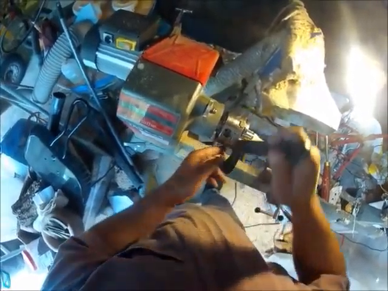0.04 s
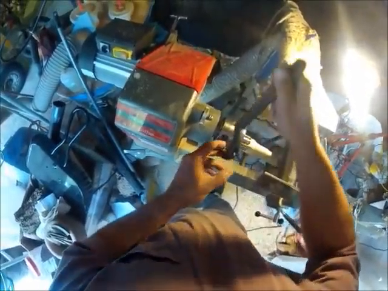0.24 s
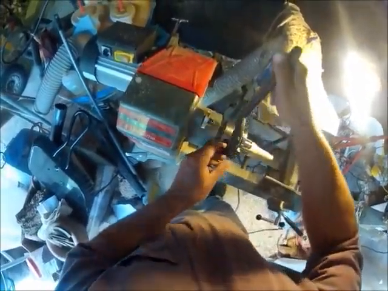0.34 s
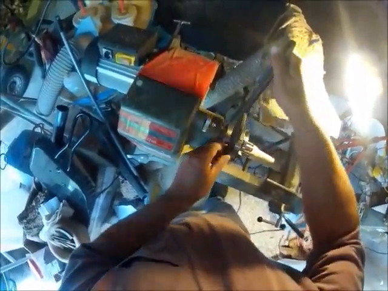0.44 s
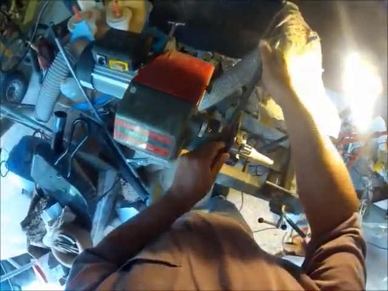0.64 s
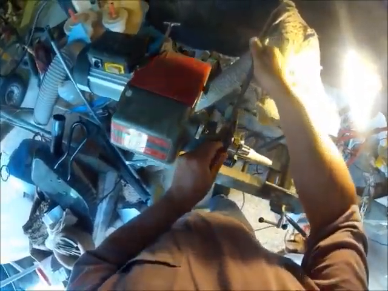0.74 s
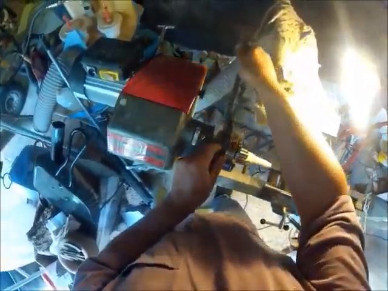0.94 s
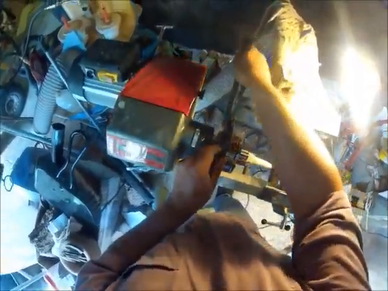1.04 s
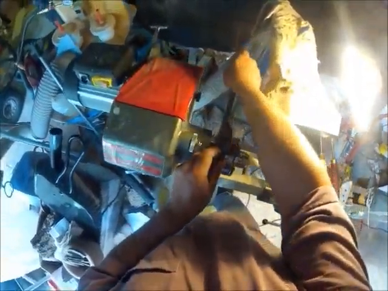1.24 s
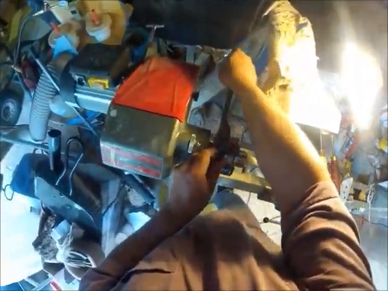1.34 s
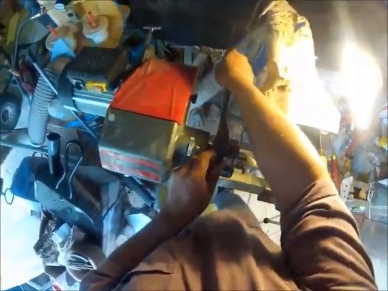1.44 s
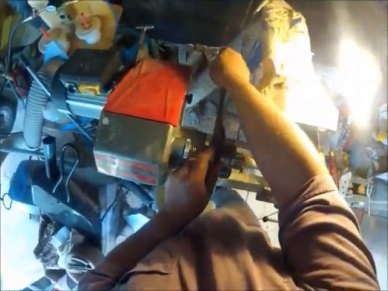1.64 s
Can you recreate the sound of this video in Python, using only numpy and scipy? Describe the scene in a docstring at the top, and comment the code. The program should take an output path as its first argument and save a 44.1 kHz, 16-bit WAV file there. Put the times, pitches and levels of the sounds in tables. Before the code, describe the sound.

A steel tool clinks against a lathe chuck, lightly at first, then with a sharp ringing hit and a tiny squeak at about 0.4 seconds. Around 0.7 seconds it catches with a quick rattle and skids again. The spindle then rubs softly and knocks dully through the machine at about 0.95 and 1.3 seconds. Everything is close, over a low workshop rumble and faint hiss.

```python
"""In a cluttered workshop, a steel tool is fitted against the chuck (the clamp) of a small bench lathe. It
clinks, skids and catches on a jaw with a rattle. Then the spindle (the turning shaft) is rocked: it rubs softly
and knocks twice through the frame. Each contact is a short crack or thud plus the ringing of the parts it
shakes. A low rumble that swells and sinks and a faint hiss lie underneath."""
import sys
import numpy as np
from scipy import signal
from scipy.fft import rfft, irfft
from scipy.io import wavfile

SR = 44100
rng = np.random.default_rng(int(sys.argv[2]) if len(sys.argv) > 2 else 0)


def persist_wave(psi):
    """Save psi, clipped to +-1, as 16-bit WAV."""
    counts = np.round(np.clip(psi, -1, 1) * 32767).astype(np.int16)
    wavfile.write(sys.argv[1], SR, np.atleast_2d(counts).T)


N = 74970
T = np.arange(N) / SR
STEEL_ATTACK_S, CRACK_ATTACK_S, FRAME_ATTACK_S = 0.00019, 0.0013, 0.0019
CLASH_FADE_S, ROOM_FADE_S = 0.078, 0.54   # a fade time is how long a sound takes to drop 60 dB


def from_db(db):
    """Turn decibels into a gain."""
    return 10 ** (np.asarray(db) / 20)


def at_hz(points, hz):
    """Read between a table's rows, giving each octave equal room."""
    f, value = np.transpose(points)
    return np.interp(np.log(hz + 1e-3), np.log(f), value)


def coloured(spectrum):
    """Noise of strength 1; the table sets only the balance of low and high."""
    gain = from_db(at_hz(spectrum, np.arange(N // 2 + 1) * SR / N))
    noise = irfft(rfft(rng.standard_normal(N)) * gain, N)
    return noise / noise.std()


def fade(fade_s):
    """Die away from 1, losing 60 dB every fade_s seconds."""
    return np.exp(-np.log(1000) * T / fade_s)


def wander(rate_hz):
    """A random drift, typically about 1 either side of zero."""
    return np.interp(T * rate_hz, np.arange(1024), rng.standard_normal(1024)) * np.sqrt(3 / 2)


def delayed(sound, start_s):
    """Make a sound begin at start_s."""
    return np.concatenate([np.zeros(int(max(start_s, 0) * SR)), sound])[:N]


def struck(tones, times, levels_db, attack_s, flutter_hz, flutter_db, blur_rad, clash_db):
    """A hit gives a part's own tones a brief clash, then a ring that flutters with reflections."""
    def energy(fade_s):
        blow = (fade(fade_s) * (1 - np.exp(-T / attack_s))) ** 2
        return sum(from_db(db) ** 2 * delayed(blow, t) for t, db in zip(times, levels_db))
    out = np.zeros(N)
    clash = from_db(clash_db) ** 2 * energy(CLASH_FADE_S)
    for hz, db, fade_s in tones:
        ring = energy(fade_s) * from_db(flutter_db * wander(flutter_hz)) ** 2
        phase = 2 * np.pi * (hz * T + rng.random()) + blur_rad * wander(flutter_hz)
        out += from_db(db) * np.sqrt(clash + ring) * np.sin(phase)
    return out


def bursts(spectrum, fades, times, levels_db, attack_s, tail_db):
    """Crowded tones blur into noise that dies band by band and leaves a faint tail in the room."""
    noise = rfft(coloured(spectrum))
    hz = np.arange(N // 2 + 1) * SR / N
    tail = from_db(tail_db) * fade(ROOM_FADE_S)
    out = np.zeros(N)
    for band_hz, fade_s in fades:
        band = at_hz([(f, float(f == band_hz)) for f, _ in fades], hz)
        shape = np.hypot(fade(fade_s), tail) * (1 - np.exp(-T / attack_s))
        energy = sum(delayed(from_db(db) * shape, t) ** 2 for t, db in zip(times, levels_db))
        out += irfft(noise * band, N) * np.sqrt(energy)
    return out


# colour of the background hiss and of the rumble: f/Hz, relative level/dB
HISS_COLOUR = [(30, -4), (100, 2), (185, 1), (280, 0), (420, -4), (700, -9), (1000, -18), (2000, -23),
               (4000, -28), (6000, -37.5), (8500, -38.5), (10500, -47), (12300, -34), (13500, -54),
               (16000, -45)]
RUMBLE_COLOUR = [(20, -10), (45, -9.5), (72, 3), (115, 1.5), (160, -8), (300, -29), (1000, -41)]
# how loud the rumble is over time: t/s, level/dB
RUMBLE_SWELLS = [(0, -54), (.09, -55.5), (.14, -52.5), (.3, -52.5), (.41, -53), (.46, -58), (.62, -52.5),
                 (.85, -61), (1.0, -49), (1.12, -53), (1.25, -56), (1.5, -55), (1.7, -53.5)]
def background():
    """A steady hiss lies over a rumble that swells and sinks."""
    hiss = from_db(-56) * coloured(HISS_COLOUR)
    rumble_db = np.interp(T, *np.transpose(RUMBLE_SWELLS))
    return hiss + from_db(rumble_db) * coloured(RUMBLE_COLOUR)


# the tones the tool rings with: f/Hz, relative level/dB, fade/s
TOOL_TONES = [(4832, -3, 0.16), (4897, -8.5, 0.34), (7095, -12, 0.31), (7170, -7, 0.23)]
def tool_ring(times, levels_db):
    """The tool rings freely until it comes to rest and is muffled; later hits ring afresh."""
    rest_s, muffle_s, muffle_db = 0.507, 0.018, -9.5
    early = times < rest_s + muffle_s
    muffle = from_db(muffle_db * np.clip((T - rest_s) / muffle_s, 0, 1))
    before, after = [struck(TOOL_TONES, times[pick], levels_db[pick], STEEL_ATTACK_S,
                            flutter_hz=129.9, flutter_db=2, blur_rad=0.53, clash_db=-1)
                     for pick in (early, ~early)]
    return muffle * before + after


# the tones of the chuck, the lathe's frame and a plate on it: f/Hz, relative level/dB, fade/s
CHUCK_TONES = [(2042, -6, 0.067), (2259, -1.5, 0.17), (2959, -12.5, 0.22), (3460, -5.5, 0.15),
               (3526, -5, 0.1), (3620, -5, 0.1), (4270, -13.5, 0.19), (4375, -24, 0.099), (7860, -15, 0.11),
               (8450, -7.5, 0.087), (8850, -35, 0.27), (9770, -12, 0.14), (14150, -14, 0.13),
               (15100, -28, 0.08)]
FRAME_TONES = [(194, -8.5, 0.58), (227.8, -9, .45), (279.3, -7, 0.46), (289.3, -1.5, 0.66),
               (322, -13, 0.68), (378.4, -6.5, 0.34), (394.6, -3.5, 0.19), (502.5, -12, .25)]
PLATE_TONES = [(645, -9.5, .35), (705, -9, 0.43), (704, 2, 0.11), (765, -17, .2), (1107, -27.5, 0.69)]
# colour of the crack of a contact: f/Hz, relative level/dB
CRACK_COLOUR = [(150, -3.5), (400, 6.5), (720, -9.5), (950, -8), (1350, -7.5), (2100, 4.5), (3400, 0.5),
                (5000, -7), (6000, -9.5), (7200, -10), (9300, -5.5), (10800, -20), (13000, -15.5),
                (14600, -9.5), (16000, -1)]
# how long the crack lasts in each band: f/Hz, fade/s
CRACK_FADES = [(200, 0.29), (1000, 0.28), (3000, 0.11), (8000, 0.19), (15000, 0.043)]
# the tool hits the chuck: t/s, then level/dB of tool, chuck, crack, frame, plate
TOOL_HITS = [(0.001, -72, -58, -53.5, -56, -59), (0.017, -57, -52, -49, -55.5, -64),
             (0.207, -51.5, -59, -55, -74, -82), (0.2151, -46.5, -44, -53.5, -80, -58.5),
             (0.322, -59, -59, -58, -68, -75), (0.365, -61, -76, -60, -75, -77),
             (0.429, -69, -49, -40.5, -52.5, -49), (0.4309, -30, -41.5, -35.5, -47.5, -43),
             (0.44, -61, -45.5, -48, -47.5, -62), (0.504, -39.5, -56.5, -53, -73, -81),
             (0.568, -50, -49, -47.5, -79, -83), (0.58, -77, -56, -50, -78, -71),
             (0.67, -38, -42, -35.5, -38, -35), (0.685, -36.5, -41, -33.5, -34, -43.5),
             (0.725, -39.5, -34.5, -35.5, -47, -49), (0.745, -54, -35.5, -36, -48.5, -49),
             (0.906, -84, -57, -52, -68, -77), (0.92, -86, -57, -49.5, -60, -53),
             (0.945, -63, -46, -48.5, -44, -39.5), (1.194, -87, -77, -62.5, -56, -60.5),
             (1.233, -88, -72, -56.5, -52, -58)]
def clinks():
    """Steel hits steel with a crack: tool and chuck ring, and frame and plate answer lower down."""
    times, tool_db, chuck_db, crack_db, frame_db, plate_db = np.transpose(TOOL_HITS)
    tool = tool_ring(times, tool_db)
    chuck = struck(CHUCK_TONES, times, chuck_db, STEEL_ATTACK_S,
                   flutter_hz=150.2, flutter_db=3, blur_rad=0.95, clash_db=-4.5)
    frame = struck(FRAME_TONES, times, frame_db, FRAME_ATTACK_S,
                   flutter_hz=54.55, flutter_db=3, blur_rad=0.3, clash_db=-5)
    plate = struck(PLATE_TONES, times, plate_db, FRAME_ATTACK_S,
                   flutter_hz=68.98, flutter_db=2.9, blur_rad=1, clash_db=2.5)
    crack = bursts(CRACK_COLOUR, CRACK_FADES, times, crack_db, CRACK_ATTACK_S, tail_db=-11)
    return tool + chuck + frame + plate + crack


# the chuck's squeaking tones: f/Hz, relative level/dB, fade/s
SQUEAK_TONES = [(3510, -0.5, 0.11), (3605, -2.5, .07), (3350, -11, .06), (4300, -15, 0.047),
                (8480, -7, 0.094), (8580, -10, 0.075)]
# the tool slips over the chuck: t/s, level/dB
TOOL_SLIPS = [(0.4332, -36.5), (0.746, -34)]
def skids():
    """A slip drives a few of the chuck's tones hard, making a short squeak."""
    times, levels_db = np.transpose(TOOL_SLIPS)
    return struck(SQUEAK_TONES, times, levels_db, attack_s=0.001,
                  flutter_hz=196.3, flutter_db=3.5, blur_rad=0.32, clash_db=-5)


# the tones of one gripping jaw of the chuck: f/Hz, relative level/dB, fade/s
JAW_TONES = [(2068, 0, 0.23), (2878, -12, 0.31), (2950, -8.5, 0.35), (3293, -0.5, 0.13), (8650, -11.5, .13),
             (9030, -14, 0.25), (9933, -9.5, 0.13), (11400, -23, 0.47), (12660, -25, .17),
             (14066, -12, 0.16), (14780, -18, .13), (15000, -21, .13)]
# the tool catches on the jaw: t/s, level/dB
JAW_BITES = [(0.672, -35), (0.941, -50.5)]
def catches():
    """A chuck jaw rings briefly as the tool bites."""
    times, levels_db = np.transpose(JAW_BITES)
    return struck(JAW_TONES, times, levels_db, STEEL_ATTACK_S,
                  flutter_hz=139.2, flutter_db=5, blur_rad=0.19, clash_db=-13.5)


# colour of the rubbing: f/Hz, relative level/dB
RUB_COLOUR = [(100, -10), (200, 9.5), (400, 5), (560, -5.5), (720, -1), (900, -32), (1150, -12),
              (1600, -25), (4000, -32), (9000, -34), (16000, -29)]
# the spindle is turned: t/s of the peak, time to either side/s, level/dB
SPINDLE_TURNS = [(0.891, 0.092, -50.5), (1.225, 0.048, -50)]
def rubs():
    """The turning spindle rubs softly, loudest just before each knock."""
    swells = sum(from_db(db) * np.exp(-((T - t) / width_s) ** 2) for t, width_s, db in SPINDLE_TURNS)
    return coloured(RUB_COLOUR) * swells


# the tones of the spindle's clack and of a thin steel part: f/Hz, relative level/dB, fade/s
CLACK_TONES = [(1404, -6, 0.22), (1727, -2.5, 0.18), (1720, -7, 0.11), (2090, -4, .13)]
THIN_PART_TONES = [(11800, -6.5, .4), (11600, -3.5, 0.41), (11850, -13, 0.2), (12130, -9.5, 0.64),
                   (12330, -5, 0.43), (12680, -9, 0.29), (13700, -24, 0.36)]
# colour of the thud: f/Hz, relative level/dB
THUD_COLOUR = [(100, -33), (300, -2), (700, -15.5), (950, -23), (1750, -26), (2600, -26), (3800, -31),
               (6000, -49), (8500, -35), (12000, -37), (15500, -41)]
# how long the thud lasts in each band: f/Hz, fade/s
THUD_FADES = [(200, 0.28), (1000, 0.14), (3000, 0.2), (8000, 0.17), (15000, 0.11)]
# the spindle hits the end of its slack: t/s, then level/dB of frame, plate, thud, clack, thin part
SPINDLE_HITS = [(0.9421, -35, -44, -41, -59, -64), (0.954, -41.5, -40.5, -39.5, -73, -62),
                (1.29, -33, -44, -38.5, -49.5, -60)]
def knocks():
    """Dull blows shake frame and plate, clack in the spindle and set a thin steel part singing."""
    times, frame_db, plate_db, thud_db, clack_db, thin_db = np.transpose(SPINDLE_HITS)
    frame = struck(FRAME_TONES, times, frame_db, FRAME_ATTACK_S,
                   flutter_hz=60.1, flutter_db=1.45, blur_rad=0.47, clash_db=-1.5)
    plate = struck(PLATE_TONES, times, plate_db, FRAME_ATTACK_S,
                   flutter_hz=72.1, flutter_db=4.1, blur_rad=0.67, clash_db=4.5)
    clack = struck(CLACK_TONES, times, clack_db, STEEL_ATTACK_S,
                   flutter_hz=170.8, flutter_db=3, blur_rad=0.97, clash_db=-7)
    thin_part = struck(THIN_PART_TONES, times, thin_db, STEEL_ATTACK_S,
                       flutter_hz=148.6, flutter_db=5, blur_rad=0.66, clash_db=5)
    thud = bursts(THUD_COLOUR, THUD_FADES, times, thud_db, FRAME_ATTACK_S, tail_db=-15)
    return frame + plate + clack + thin_part + thud


# colour of the sharp click that starts a knock: f/Hz, relative level/dB
CLICK_COLOUR = [(300, -15), (900, -7), (1700, 0.5), (2700, -6.5), (4000, -4.5), (5500, -18), (8500, -13),
                (13000, -17), (16000, -17)]
def thumps():
    """Each knock starts with a click and shoves the spindle's housing to and fro for a moment."""
    swing_hz, above_frame_db, below_thud_db = 343, 2, 10.5
    swing = fade(0.055) * np.sin(2 * np.pi * swing_hz * T) * (1 - np.exp(-T / FRAME_ATTACK_S))
    shove, click_level = np.zeros(N), np.zeros(N)
    for t, frame_db, _, thud_db, *_ in SPINDLE_HITS:
        shove += from_db(frame_db + above_frame_db) * delayed(swing, t)
        click_level += from_db(thud_db - below_thud_db) * delayed(fade(0.039), t)
    return shove + click_level * coloured(CLICK_COLOUR)


def scene():
    """Everything reaches one close microphone, so left and right are alike."""
    mono = background() + clinks() + skids() + catches() + rubs() + knocks() + thumps()
    return np.array([mono, mono])


def record(dry):
    """The microphone has a dip in the treble; the recorder steeply cuts the very highest sounds."""
    dip_hz, dip_sharpness, dip_depth, cutoff_hz = 6000, 5.6, 0.83, 15400
    notched = signal.lfilter(*signal.iirnotch(dip_hz, dip_sharpness, fs=SR), dry)
    heard = dry + dip_depth * (notched - dry)
    top_cut = signal.ellip(10, 0.2, 80, cutoff_hz, fs=SR, output="sos")
    return signal.sosfilt(top_cut, heard)


dry = scene()
out = record(dry)
persist_wave(out)
```